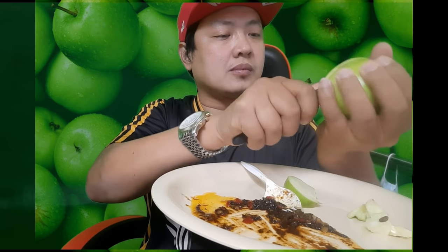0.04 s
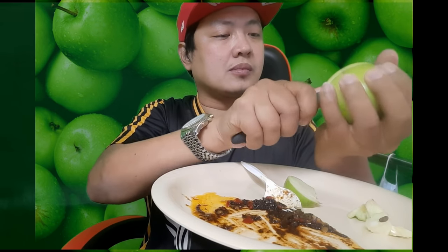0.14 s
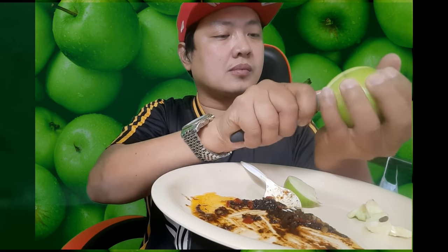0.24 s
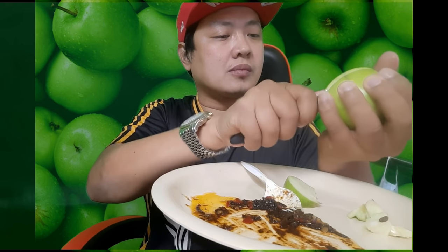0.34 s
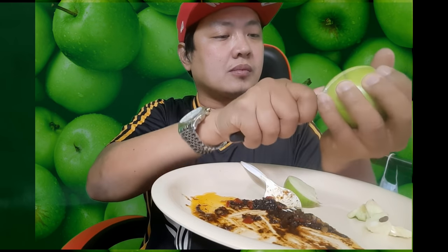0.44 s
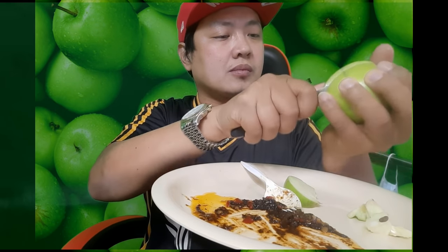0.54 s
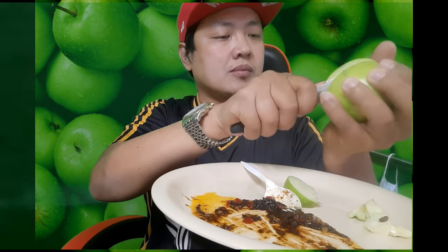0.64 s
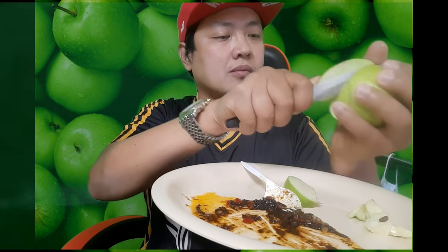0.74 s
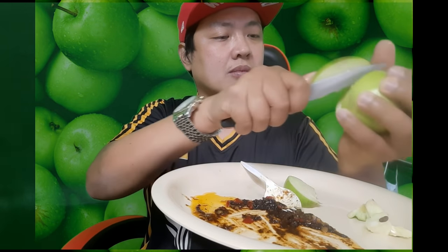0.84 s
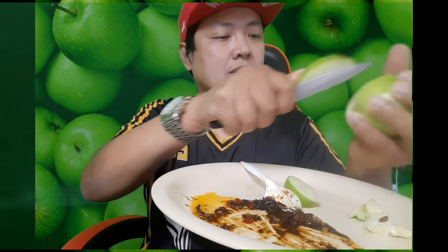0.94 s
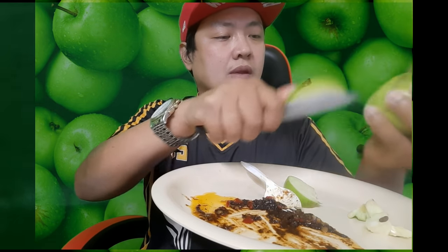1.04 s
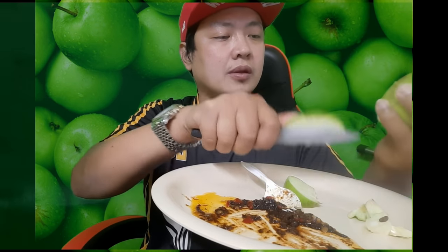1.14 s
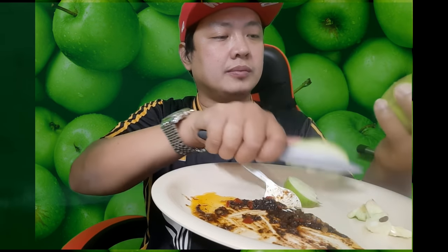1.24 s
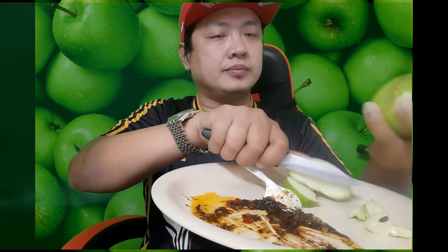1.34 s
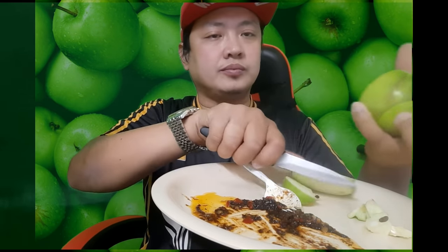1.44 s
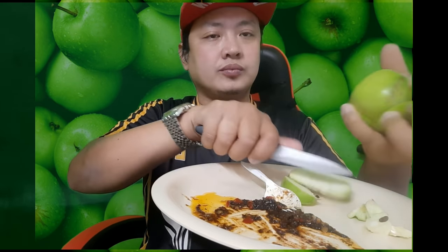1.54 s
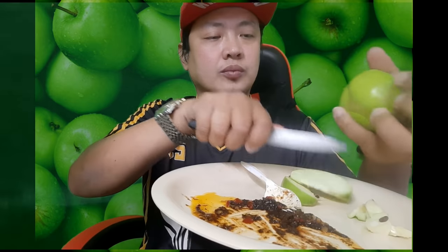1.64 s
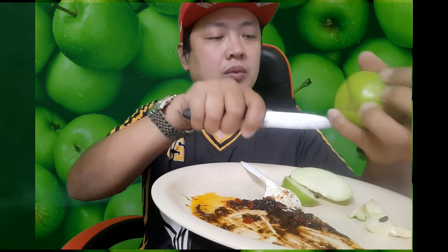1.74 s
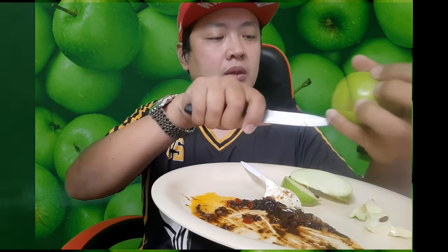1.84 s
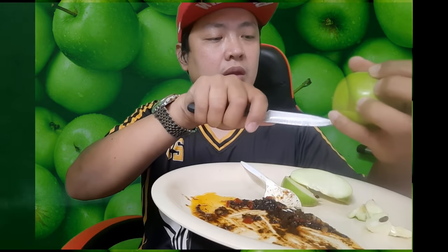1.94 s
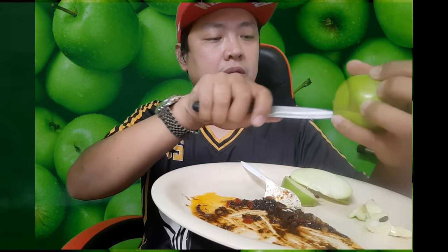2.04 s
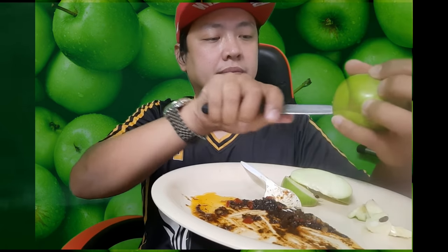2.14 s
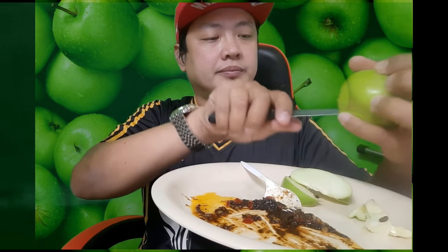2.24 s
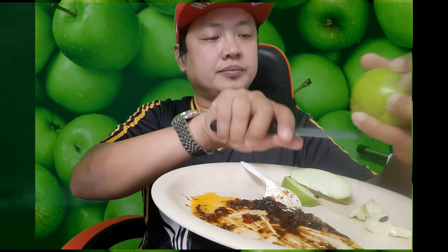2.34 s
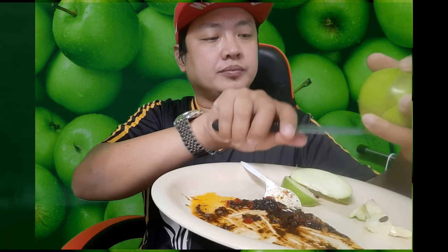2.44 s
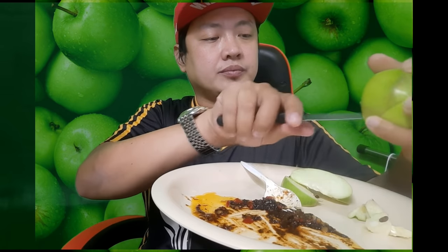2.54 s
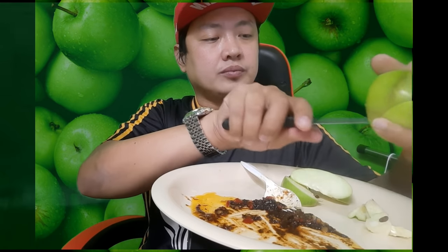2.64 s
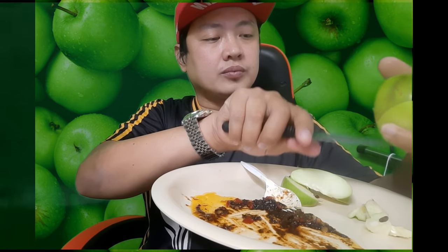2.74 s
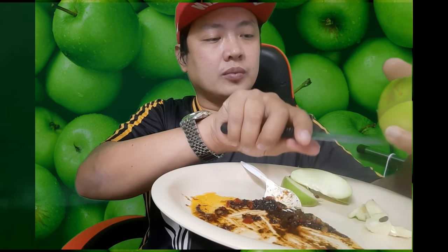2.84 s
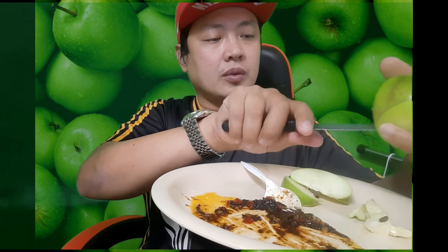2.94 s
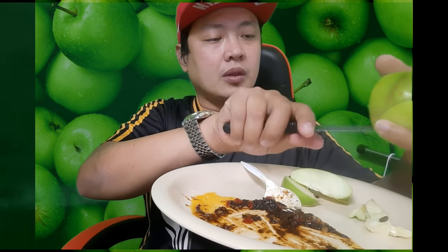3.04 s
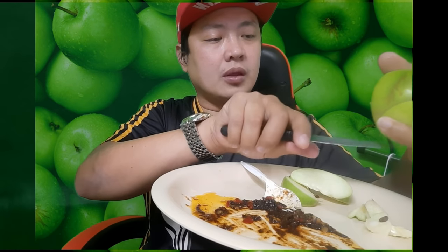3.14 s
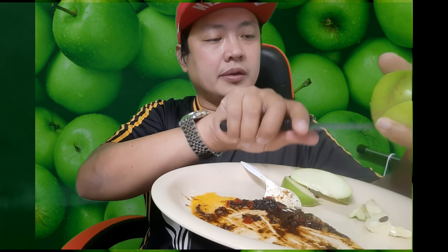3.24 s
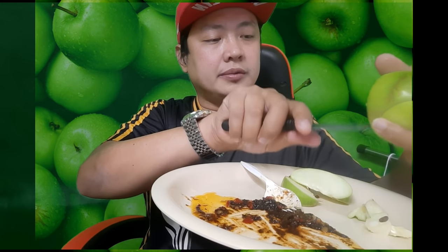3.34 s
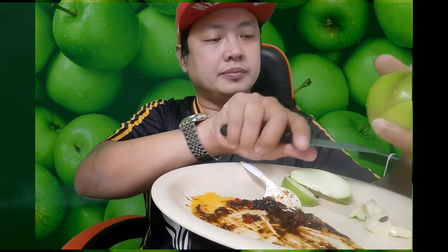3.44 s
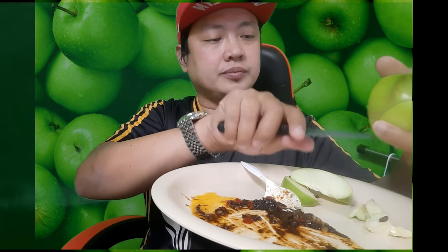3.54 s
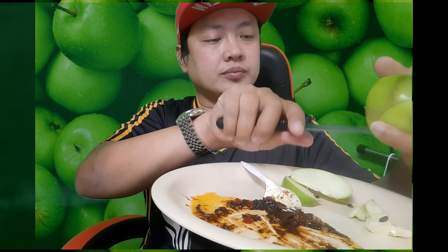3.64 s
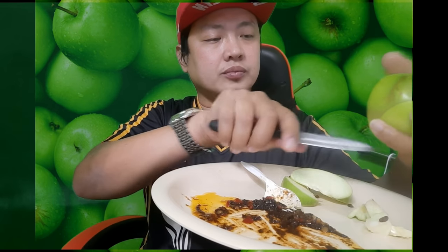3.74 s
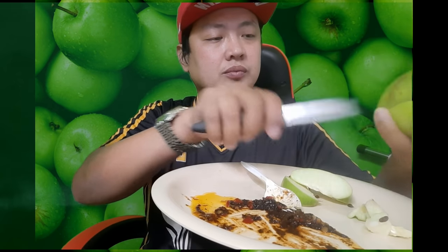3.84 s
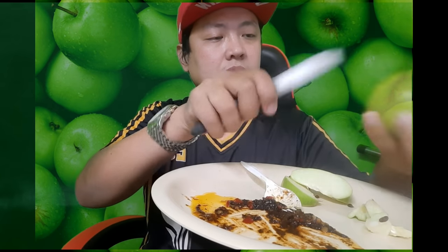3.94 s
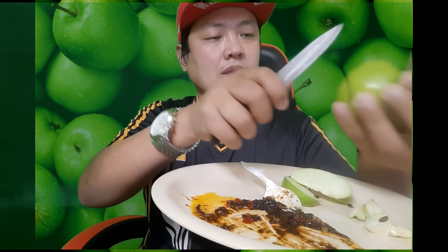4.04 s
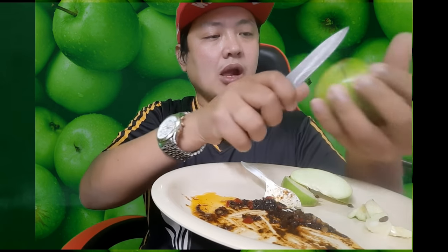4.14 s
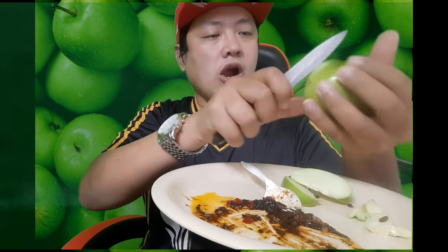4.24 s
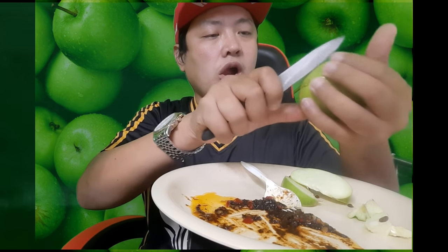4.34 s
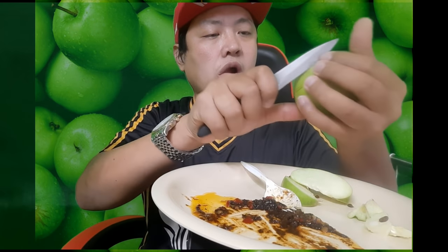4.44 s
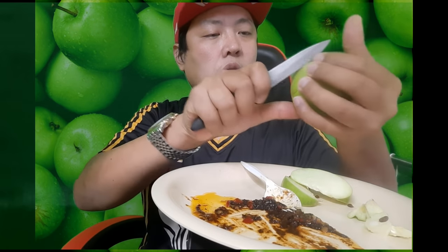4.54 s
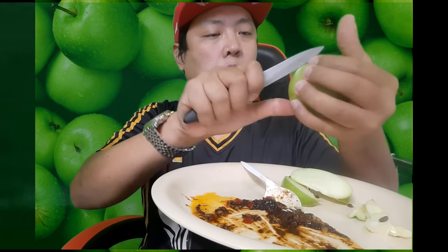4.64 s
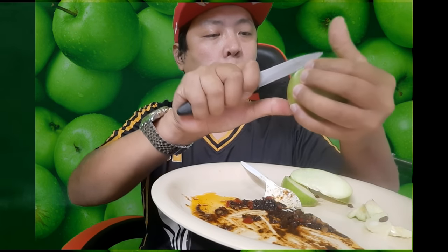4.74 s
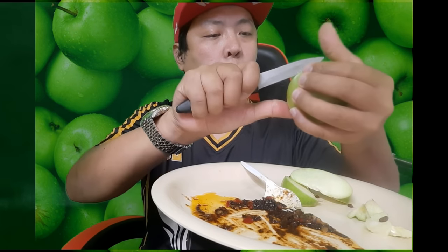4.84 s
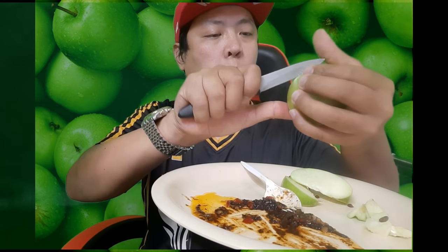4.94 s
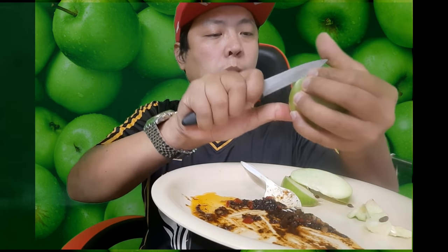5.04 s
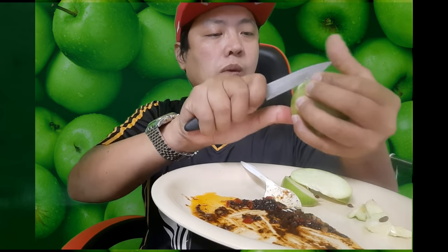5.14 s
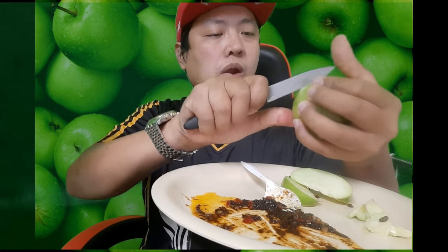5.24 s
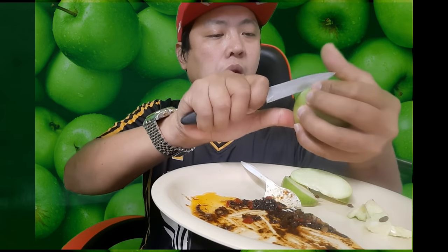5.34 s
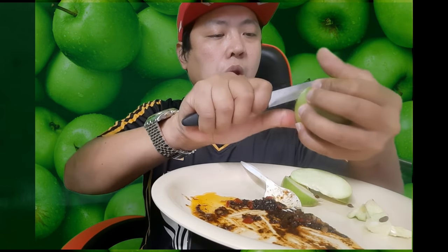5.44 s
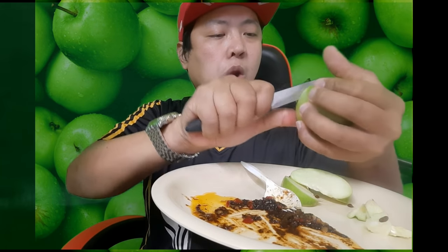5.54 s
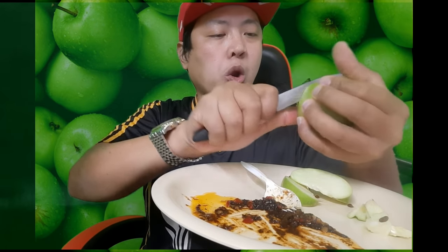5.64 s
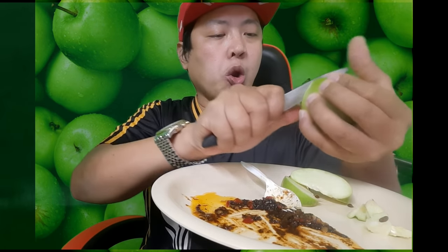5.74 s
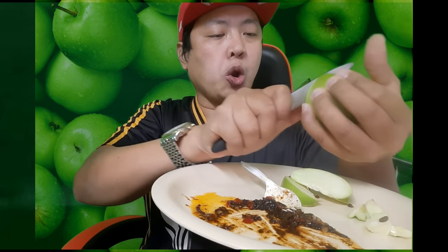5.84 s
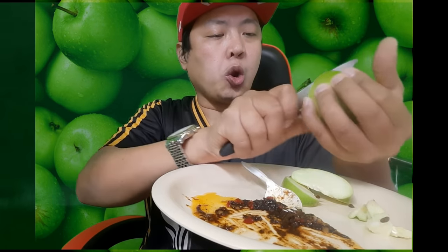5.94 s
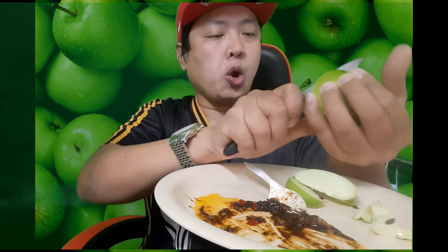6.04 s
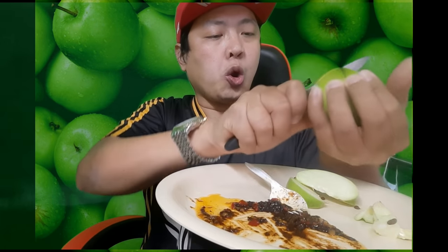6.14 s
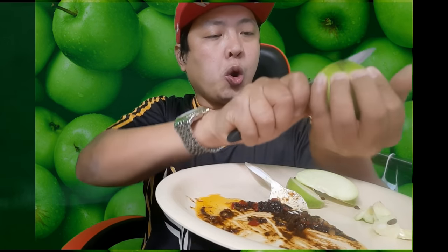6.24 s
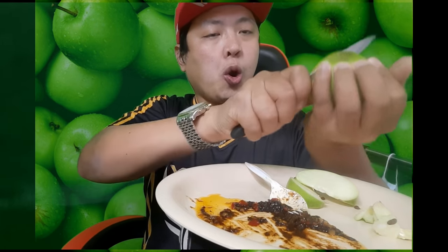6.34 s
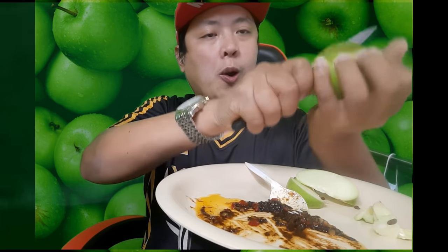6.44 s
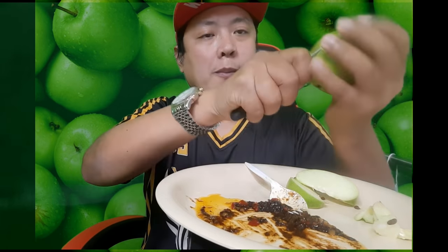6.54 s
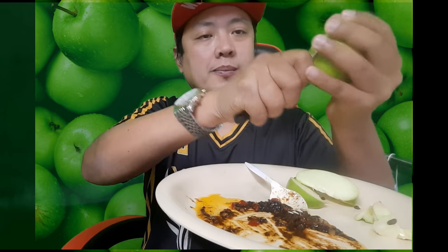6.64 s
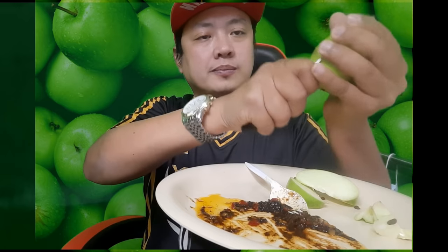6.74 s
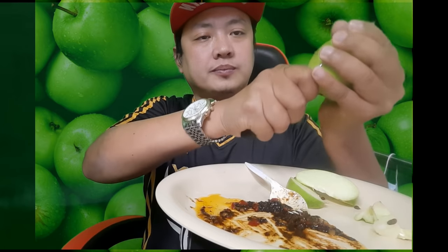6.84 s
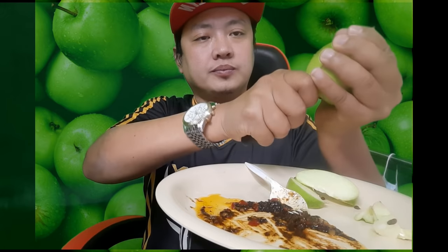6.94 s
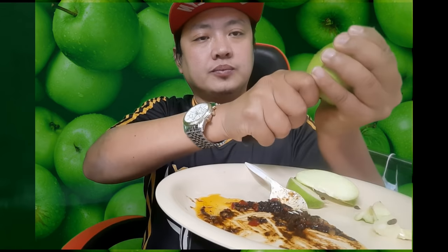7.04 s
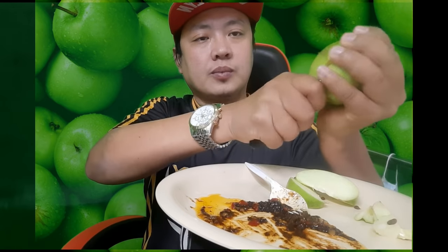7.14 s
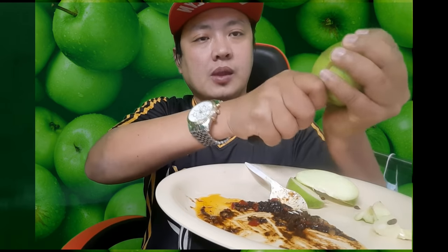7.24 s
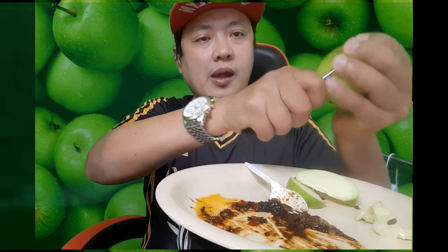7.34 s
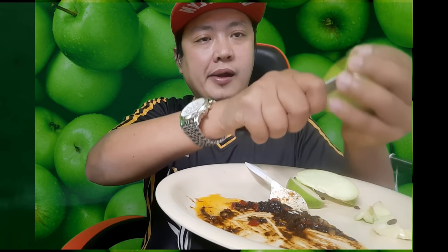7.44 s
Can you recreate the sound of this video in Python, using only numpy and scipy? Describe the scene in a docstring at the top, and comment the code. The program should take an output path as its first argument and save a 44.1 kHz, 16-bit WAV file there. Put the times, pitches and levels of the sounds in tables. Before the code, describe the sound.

A knife slices a crisp apple with wet cracks and soft tearing, and a slice drops onto a plate, over a low fan hum.

```python
"""Slicing a crisp apple

A knife cuts a hand-held apple to the right of two microphones. Tearing cells hiss, sudden splits crack
and wet ticks sound between them; flesh, skin and juice colour the cut by their resonances. A slice drops
on a plate and rocks, exciting the modes of plate and table. A small room reverberates, and a fan hums
and rushes underneath."""
import sys
import numpy as np
from scipy import signal
from scipy.fft import rfft, irfft
from scipy.io import wavfile
from scipy.ndimage import uniform_filter1d

SR = 44100
rng = np.random.default_rng(int(sys.argv[2]) if len(sys.argv) > 2 else 0)


def inscribe(sig):
    """Save sig as 16-bit PCM at rate SR to the path in sys.argv[1].

    A 1-D sig is mono; a 2-D sig holds one channel per row.
    Samples are clipped to [-1, 1] before scaling.
    """
    pcm = np.round(np.clip(np.atleast_2d(sig).T, -1, 1) * 32767)
    wavfile.write(sys.argv[1], SR, pcm.astype(np.int16))


N = 330750

# resonances of the apple's flesh, skin and juice: (frequency [Hz], bandwidth [Hz], level [dB])
FLESH_MODES = [(1836, 280, -5), (2430, 470, 0), (2710, 780, -1), (3560, 980, -4.5)]
SKIN_MODES = [(4540, 780, -5), (5460, 630, -3.5), (6440, 1480, -6.5), (8320, 1330, -2)]
JUICE_MODES = [(10660, 5100, 1.5), (13630, 3200, 5)]


def undb(db):
    """Amplitude ratio of a level in decibels."""
    return 10 ** (np.asarray(db) / 20)


def unit(x):
    """Normalisation to an rms of 1."""
    return x / np.sqrt(np.mean(x ** 2))


def pan(db):
    """Left and right gains for a level difference, left minus right."""
    return undb([[db / 2], [-db / 2]])


def band(x, hz, width_hz):
    """Second-order resonator with unit gain at its centre."""
    return signal.lfilter(*signal.iirpeak(hz, hz / width_hz, SR), x)


def body(x, modes):
    """Parallel fourth-order resonators of alternating sign, roughly preserving the power of white noise."""
    power = sum(undb(2 * db) * np.pi * width / SR for _, width, db in modes)
    rings = ((-1) ** k * undb(db) * band(band(x, hz, 1.62 * width), hz, 1.62 * width)
             for k, (hz, width, db) in enumerate(modes))
    return sum(rings) / np.sqrt(power)


def on_log(hz, table):
    """Interpolation of a spectrum along a logarithmic frequency axis."""
    table_hz, values = np.transpose(table)
    return np.interp(np.log(hz), np.log(table_hz), values)


def bursts(times, gains, decay_s):
    """Superposition of exponential decays, one starting at each time."""
    kicks = np.zeros(N)
    np.add.at(kicks, (times * SR).astype(int), gains)
    return signal.lfilter([1], [1, -np.exp(-1 / (decay_s * SR))], kicks)


def stereo_noise(shared):
    """Partially coherent noise: the two channels have a share of their power in common."""
    common, left, right = rng.standard_normal((3, N))
    return np.sqrt(shared) * common + np.sqrt(1 - shared) * np.array([left, right])


def flicker(rate_hz):
    """Random modulation of unit rms in a broad band around a rate."""
    return unit(band(rng.standard_normal(N), rate_hz, 2 * rate_hz))


def fan(level_db=-43.5, swell_db=0.75, pan_db=1.55, right_lag_s=0.00029):
    """Broadband air noise with narrow hums; the coherent bass reaches the left microphone first."""
    rush = [(20, -46), (32, -37), (45, -19.5), (76, -23), (120, -10), (210, -16.5), (300, -9.5), (600, -17),
            (1000, -21.5), (2000, -30), (3500, -40.5), (5000, -51.5), (8000, -52.5), (16000, -60.5)]  # (frequency [Hz], relative spectral density [dB])
    hums = [(49, 10.6, 7), (138.3, 3.6, 10.5), (179, 4.1, 16), (246.1, 7.2, 15), (342.1, 11, 9.5),
            (388, 13, 4.5), (462.5, 14.2, 9), (496.5, 4.4, 7.5), (615, 32, 3)]  # (frequency [Hz], bandwidth [Hz], level over the rush [dB])
    coherence = [(40, 0.6), (130, 0.93), (290, 0.96), (640, 0.88), (1400, 0.27), (3000, 0.034),
                 (15000, .02)]  # (frequency [Hz], share of power common to both sides [0-1])
    hz = np.maximum(np.fft.rfftfreq(N, 1 / SR), 1)
    hum_power = sum((undb(db) ** 2 - 1) / (1 + (2 * (hz - f) / width) ** 2) for f, width, db in hums)
    spectrum = undb(on_log(hz, rush)) * np.sqrt(1 + hum_power)
    shared = on_log(hz, coherence)
    common, left, right = rfft(rng.standard_normal((3, N)))
    delay = np.exp(-2j * np.pi * hz * right_lag_s)
    coherent = np.sqrt(shared) * np.array([common, common * delay])
    diffuse = np.sqrt(1 - shared) * np.array([left, right])
    air = irfft(spectrum * (coherent + diffuse), N)
    drift_db = swell_db * unit(band(rng.standard_normal(N), 2.3, 7.0))
    return unit(air) * undb(level_db - drift_db) * pan(pan_db)


def stroke_gains(attack_db_per_s=1506, release_db_per_s=322):
    """Envelopes of skin, flesh, juice and hollow; overlapping strokes are incoherent and add in power."""
    # strokes of blade and fingers: (start [s], duration [s], first skin level [dB], last skin level [dB],
    # flesh re skin [dB], juice re skin [dB], hollow re skin [dB])
    strokes = [(0.06, 0.24, -60, -57.5, -4.5, -0.5, -9), (0.375, 0.27, -59, -68, -5, -1, -2),
               (0.603, 0.049, -51.5, -50, 1.5, -0.5, -12), (0.71, 0.015, -41, -55, -7, 5, -1),
               (0.7345, 0.021, -41, -43.5, -9, 2, -15), (1.16, 0.18, -69, -88, 8, -2, -4),
               (2.24, 0.04, -66, -62, 8.5, 1, -2), (2.337, 0.012, -46, -46.5, -1, 0.5, -2),
               (2.445, 0.044, -54, -52, -5, -9, -14), (2.657, 0.036, -52.5, -64, 3, -1, -4),
               (3.046, 0.017, -65, -66.5, 5, 0, 3), (3.116, 0.0093, -54.5, -66, 3, 2, 1.5),
               (3.26, 0.065, -70, -80, -7, 3, -8), (3.443, 0.027, -59, -58.5, -1.5, -1, -3),
               (3.59, 0.035, -60, -58, 0, -12, -12), (4.092, 0.094, -67, -77, -1, 2, -10),
               (5.01, 0.15, -72.5, -76, 2, 0.5, -12), (5.3, 0.08, -74, -69, -4, 3, -12),
               (5.453, 0.029, -44, -51.5, 3, 2, -12), (5.53, 0.17, -63, -58, 2, 1, -13),
               (5.72, 0.195, -57.5, -55, 1.5, 1.5, -12), (5.94, 0.051, -53, -47.5, -5, 2, -11),
               (6.05, 0.086, -55, -56, 3, 3, -14), (6.163, 0.14, -50, -56, 1, 1, -13),
               (6.3, 0.13, -56.5, -57.5, -2, 3.5, -9), (6.814, 0.2, -57.5, -51.5, -7, -1.5, -15),
               (6.985, 0.081, -46, -60, -3, 0, -18), (7.134, 0.026, -40.5, -39, -3, 2, -15),
               (7.17, 0.077, -50, -60, 11.5, -3, -12), (7.32, 0.2, -59.5, -62, -0.5, -3, -6)]
    t = np.arange(N) / SR
    power = np.zeros((4, N))
    for start, length, first_db, last_db, flesh_db, juice_db, hollow_db in strokes:
        skin_db = np.interp(t, [start, start + length], [first_db, last_db])
        skin_db -= attack_db_per_s * np.maximum(start - t, 0)
        skin_db -= release_db_per_s * np.maximum(t - start - length, 0)
        power += (undb(skin_db) * undb([[0], [flesh_db], [juice_db], [hollow_db]])) ** 2
    return np.sqrt(power)


def tear(pops_per_s=700, spread_db=3.0, limit_db=17, steady_hiss=2.4, flicker_db=2.0, flicker_hz=25):
    """Shot noise: cells of uneven size burst at random over a hiss and excite the apple's resonances."""
    hollow_modes = [(2760, 660, -6), (6024, 620, 3)]  # a wet hollow: (frequency [Hz], bandwidth [Hz], level [dB])
    bursting = rng.random(N) < pops_per_s / SR
    sizes = undb(np.minimum(spread_db * rng.exponential(size=N), limit_db))
    pops = uniform_filter1d(bursting * sizes, size=12)  # each lasts a quarter of a millisecond
    # the cut is an extended source, so the two microphones share only part of it
    hiss = unit(unit(pops) + steady_hiss) * stereo_noise(shared=0.066)
    layers = zip(stroke_gains(), (SKIN_MODES, FLESH_MODES, JUICE_MODES, hollow_modes))
    out = sum(body(gain * undb(flicker_db * flicker(flicker_hz)) * hiss, modes) for gain, modes in layers)
    return out * pan(1.0)


def room(x, wet_db=-4.0, first_echo_s=0.0019):
    """Reverberation: convolution with exponentially decaying noise, different at each microphone."""
    decays = [(700, 0.34), (2500, 0.4), (6000, 0.3), (12000, 0.34)]  # (frequency [Hz], reverberation time T60 [s])
    t = np.arange(int(.5 * SR)) / SR
    tail = sum(band(rng.standard_normal((2, len(t))), hz, hz) * undb(-60 * t / t60) / np.sqrt(hz * t60)
               for hz, t60 in decays)
    tail *= t > first_echo_s
    tail /= np.sqrt(np.sum(tail ** 2) / 2)
    return undb(wet_db) * signal.fftconvolve(x[None], tail, axes=1)[:, :N]


def cracks(snap_s=0.0026, spit_s=0.002, crunch_s=0.0086, rise_s=0.00071, ring_s=0.0016, width_hz=700):
    """Brittle fracture: a snap and a short crunch excite flesh, core, skin and juice; the gap rings."""
    # splits and wet smacks: (time [s], base level [dB], low ring [Hz], high ring [Hz], high ring [dB],
    # core [dB], skin [dB], juice [dB], crunch [dB], left minus right [dB]); layer levels are offsets
    splits = [(0.0948, -51.5, 3015, 7540, 0, 4.5, 2, 2, -10, 1),
              (0.269, -48, 3600, 6000, 5, -7, 1, 1, -12, -1),
              (0.527, -55, 1900, 5880, 8, -4, 10.5, 7, -15, 4),
              (0.616, -39.5, 2900, 6750, 3, -10, -1, 0, -22, -10),
              (0.629, -40, 2950, 6900, -3, -5, -9, -12, -14, 5),
              (0.688, -40.5, 3400, 7000, 4, -6, 4, -1, -15, -5),
              (0.706, -23.5, 3020, 5910, 4.5, -5.5, -4, -4.5, -22, 0.5),
              (0.7364, -19, 2890, 6420, -5.5, -15.5, -9, -13, -15, 7.5),
              (0.74, -24.5, 2790, 6960, -3, -10, -5, -10, -36, 6),
              (0.747, -27.5, 2210, 5790, -9, -26, -8, -9, -10, -13),
              (0.765, -34, 2950, 6200, -4, -12, -4, -16, -15, 4),
              (2.2413, -48, 2890, 8550, -5, -16, -8, -5, -8, 0),
              (2.4447, -37, 2680, 6900, 7, -30, 6.5, 10.5, -10, 4),
              (2.5777, -46, 3270, 6200, 1, -17, 11.5, 4, -14, 1.5),
              (2.603, -48, 3300, 4500, 3, -4, 1, 0, -15, 5),
              (2.7602, -49.5, 3300, 4640, -4, -2, -1.5, -4, -12, 3),
              (3.5728, -40.5, 2960, 6600, -6, -14, 6, -1, -12, 3),
              (4.114, -59, 3140, 8000, 0, -4, 0, 2, -14, 5),
              (5.4464, -29, 1550, 3020, 7, -0.5, -5.5, -9, -17, 5.5),
              (5.5267, -51, 1850, 10950, 10, -8, -4, 10, -20, 10),
              (5.9349, -31, 2540, 6750, -10, -14, -0.5, -6, -10.5, -1.5),
              (5.976, -33, 2510, 6130, 2, -4, -1.5, -13, -11, -1),
              (6.129, -33.5, 2660, 5500, 4.5, -1, -6.5, -22, -11.5, 0),
              (6.1708, -23.5, 3480, 6520, -2, -12, -7, -20, -18, -2.5),
              (6.173, -25, 2500, 6200, -3, -14, -4, -16, -18, -1),
              (6.181, -38, 2800, 5000, -4, -8, -14, -12, -21, 8),
              (6.4568, -23.5, 3320, 1470, -5, -11, -9.5, -16, -13.5, 0.5),
              (6.985, -35.5, 4100, 6600, 3, 0.5, 4.5, -6, -10, -0.5),
              (7.13, -37, 3730, 4500, 0, -20, 2, -3, -4.5, -4),
              (7.137, -31, 3980, 7390, 11, -3.5, 4, 0, -17, 5),
              (7.1496, -28, 3930, 5960, -8, -21, -5, -7, -13, 1),
              (7.1646, -20, 3850, 4850, 0.5, -19, -2, -8, -29, 3),
              (7.1666, -20.5, 2100, 4200, -10, -22, -11, -10, -20, 7),
              (7.174, -30, 2600, 5230, -2, -22, -8, -10, -17, -5),
              (7.4073, -45, 3400, 6250, -2, -22, -11, -14, -8, 3)]
    core_modes = [(720, 440, 0), (1527, 220, 4.5)]  # the apple's core: (frequency [Hz], bandwidth [Hz], level [dB])
    times, db, low_hz, high_hz, high_db, core_db, skin_db, juice_db, crunch_db, pan_db = np.array(splits).T
    layers = ((0, FLESH_MODES, snap_s), (core_db, core_modes, snap_s),
              (skin_db, SKIN_MODES, snap_s), (juice_db + 1.5, JUICE_MODES, spit_s))
    out = np.zeros((2, N))
    for layer_db, modes, decay_s in layers:
        sides = [undb(db - 1 + layer_db + side_db) for side_db in (pan_db / 2, -pan_db / 2)]
        envelope = [bursts(times, gains, decay_s) + bursts(times, gains * undb(crunch_db), crunch_s)
                    for gains in sides]
        out += body(stereo_noise(shared=0.54) * envelope, modes)
    # the gap that opens rings at two pitches of its own
    for ring_hz, ring_db in ((low_hz, db + 5), (high_hz, db + high_db)):
        noise = stereo_noise(shared=0.26)
        for start, level_db, hz, noise_db, side_db in zip(times, ring_db, ring_hz, crunch_db, pan_db):
            at = int(start * SR)
            t = np.arange(min(int(.12 * SR), N - at)) / SR
            ping = np.sin(2 * np.pi * hz * t) * np.exp(-t / ring_s) * (1 - np.exp(-t / rise_s))
            crunch = noise[:, at:at + len(t)] * undb(noise_db) * np.exp(-t / crunch_s)
            ring = ping + body(crunch, [(hz, width_hz, 0)])
            out[:, at:at + len(t)] += ring * undb(level_db) * pan(side_db)
    return out


def ticks(rise_s=0.00076, roughness=0.41, rough_hz=300):
    """Wet ticks: two partials under a rounded envelope, roughened by random amplitude modulation."""
    # (time [s], level [dB], low partial [Hz], high partial [Hz], high re low [dB], left minus right [dB])
    wet_ticks = [(1.172, -52, 2680, 6540, -12, 7.7), (2.0105, -51, 3640, 5960, -17, 10),
                 (2.0235, -41, 3080, 6370, -17, 10), (4.1153, -49, 3140, 7000, -17, 12),
                 (4.169, -42, 1840, 6850, -21, 11), (4.173, -44, 3040, 6600, -17, 15.6),
                 (7.381, -48, 3180, 4500, -16, 14)]
    t = np.arange(int(.03 * SR)) / SR
    envelope = t / rise_s * np.exp(1 - t / rise_s)
    wobble = unit(band(band(flicker(rough_hz), rough_hz, rough_hz), rough_hz, rough_hz))
    out = np.zeros((2, N))
    for start, db, low_hz, high_hz, high_db, pan_db in wet_ticks:
        at = int(start * SR)
        tone = np.sin(2 * np.pi * low_hz * t) + undb(high_db) * np.sin(2 * np.pi * high_hz * t)
        out[:, at:at + len(t)] += envelope * tone * undb(db) * pan(pan_db)
    return out * (1 + roughness * wobble)


def soft_impact(modes, t, push_cycles=0.7):
    """Damped modes after a soft push: each builds up over a few cycles, so the lowest peak last."""
    return sum(undb(db - 60 * t / t60) * np.sin(2 * np.pi * hz * t)
               * (1 - np.exp(-t * hz / push_cycles)) ** 2 for hz, db, t60 in modes)


def slice_on_plate(thud_db=-8.0, click_db=-3.0, click_s=0.0031, rattle_db=-11, rattle_s=0.029):
    """Impact excitation: a rocking slice rings table and plate; each contact also clicks and rattles."""
    landings = [(1.38, -12.5, -3, -26.5), (1.386, -28.5, 12.5, -10.5), (1.3975, -24, -11, -23),
                (1.425, -26, 0, -13), (1.436, -21.5, -10, -33), (1.447, -17, -16, -39),
                (1.4595, -18, -27, -22), (1.489, -25, -9, -28), (1.515, -28, -10, -28)]  # (time [s], base level [dB], plate offset [dB], click offset [dB])
    table_modes = [(95, -7, 0.086), (201, -19, 0.22), (294.4, 10, 0.058), (337, 1.5, 0.09), (414, 5, 0.054),
                   (488, 1.5, 0.027)]  # (frequency [Hz], level [dB], T60 [s])
    plate_modes = [(768, 5.5, 0.033), (890, -4, 0.015)]  # (frequency [Hz], level [dB], T60 [s])
    clink_modes = [(1810, 370, 9.5), (2730, 290, 0.5), (3580, 500, -0.5), (6200, 2000, -9.5),
                   (12300, 5000, -17.5)]  # (frequency [Hz], bandwidth [Hz], level [dB])
    times, db, plate_db, offset_db = np.transpose(landings)
    t = np.arange(int(.3 * SR)) / SR
    table_ring, plate_ring = soft_impact(table_modes, t), soft_impact(plate_modes, t)
    thuds = np.zeros(N)
    for at, gain, hardness in zip((times * SR).astype(int), undb(db + thud_db), undb(plate_db)):
        thuds[at:at + len(t)] -= gain * (table_ring + hardness * plate_ring)
    hits = undb(db + offset_db + click_db)
    contact = bursts(times, hits, click_s) + undb(rattle_db) * bursts(times, hits, rattle_s)
    return thuds + body(rng.standard_normal(N) * contact, clink_modes)


def close_reflection(x, start_s=2.43, end_s=2.64, lag_s=0.00072, echo_db=-5.5):
    """Comb filtering: for a moment the echo off a nearby hard surface interferes with the direct sound."""
    t = np.arange(N) / SR
    reflecting = (t > start_s) & (t < end_s)
    return x + reflecting * undb(echo_db) * np.roll(x, int(lag_s * SR), axis=1)


def scene():
    """Superposition of the apple, the falling slice, their reverberation and the fan."""
    apple = close_reflection(cracks() + tear() + ticks())
    apple[0] = np.roll(apple[0], 8)  # the longer path to the left microphone takes 0.18 ms more
    drop = slice_on_plate()
    return apple + drop + room(apple.mean(0) + drop / 3) + fan()


def record(dry, cutoff_hz=15900):
    """Band limiting: a steep elliptic low-pass removes the highest treble."""
    return signal.sosfilt(signal.ellip(10, .2, 70, cutoff_hz, fs=SR, output="sos"), dry)


dry = scene()
out = record(dry)
inscribe(out)
```